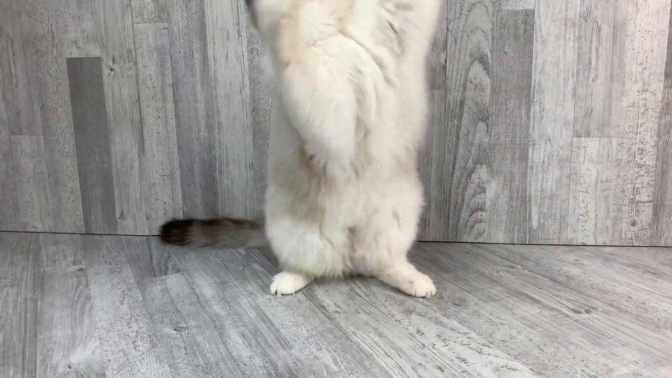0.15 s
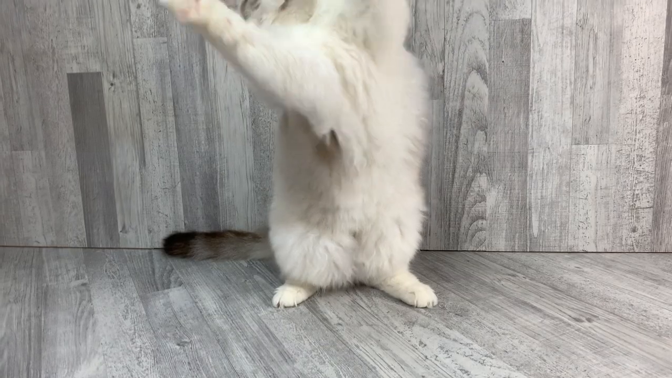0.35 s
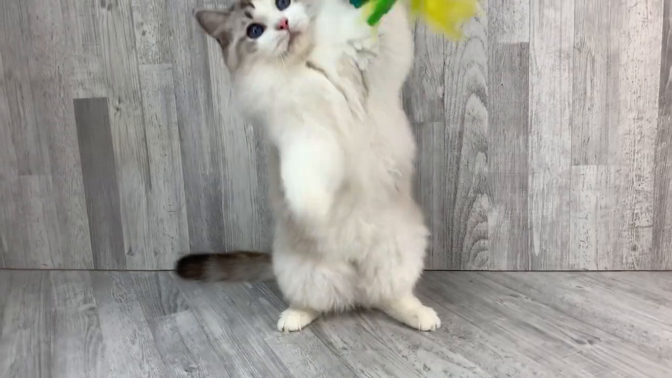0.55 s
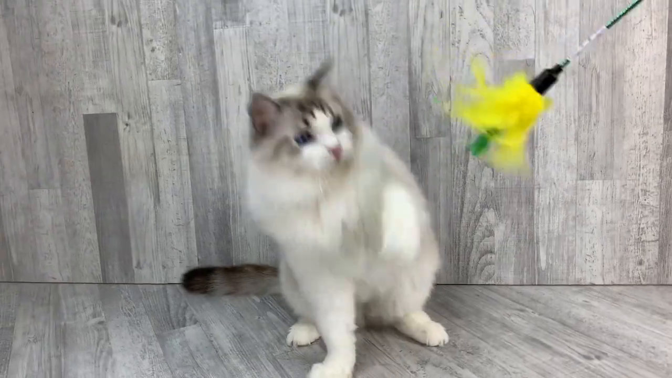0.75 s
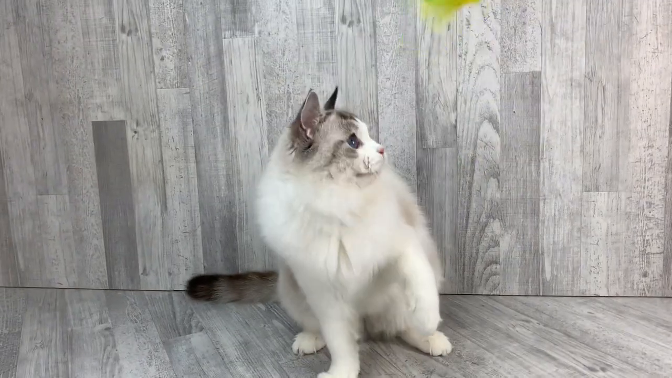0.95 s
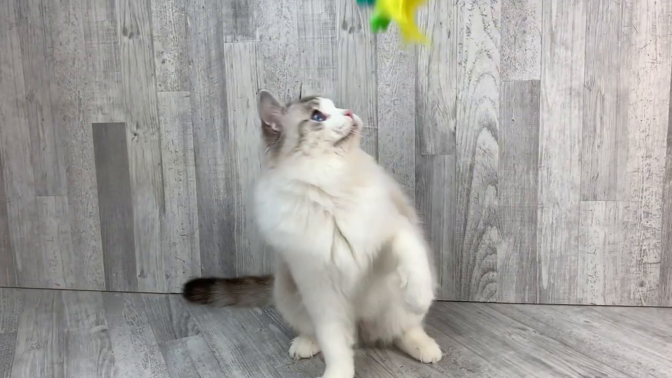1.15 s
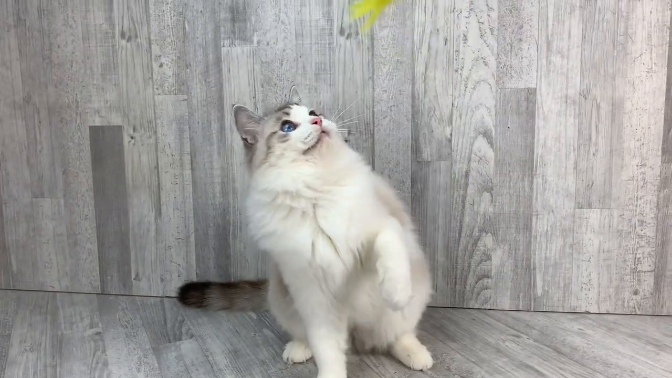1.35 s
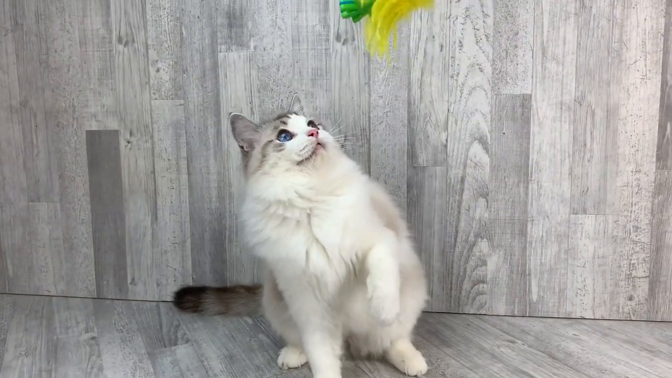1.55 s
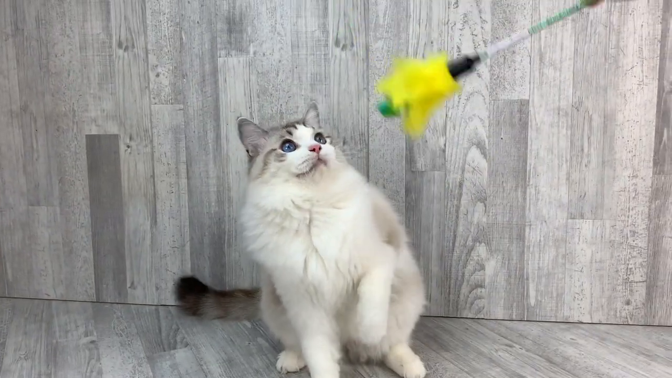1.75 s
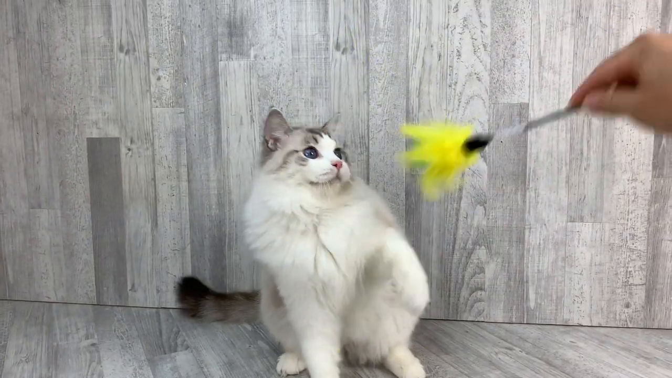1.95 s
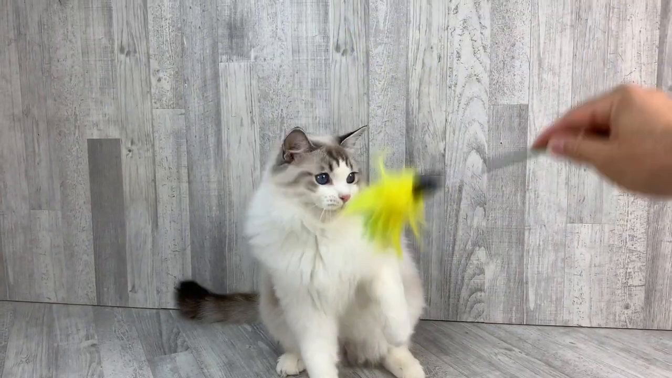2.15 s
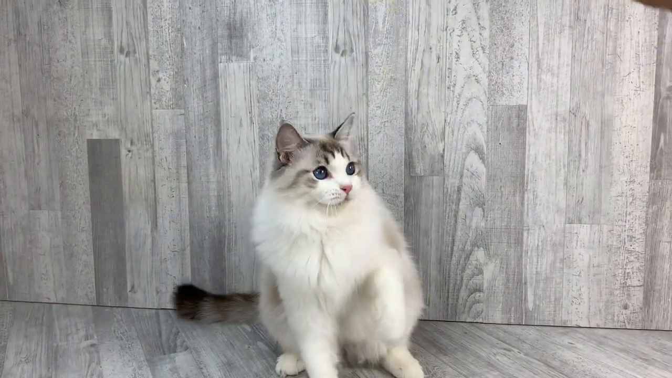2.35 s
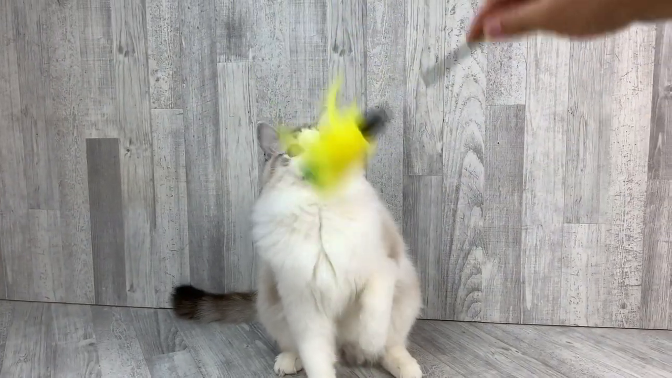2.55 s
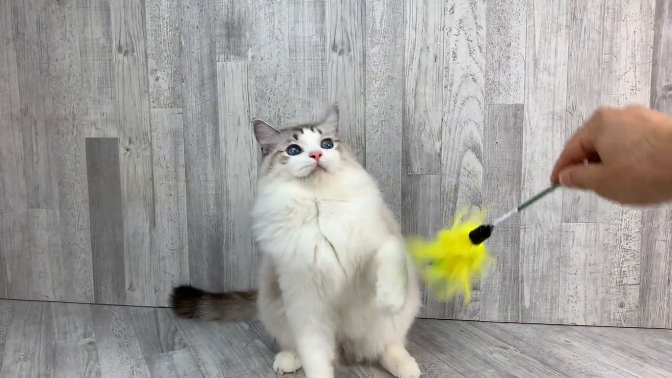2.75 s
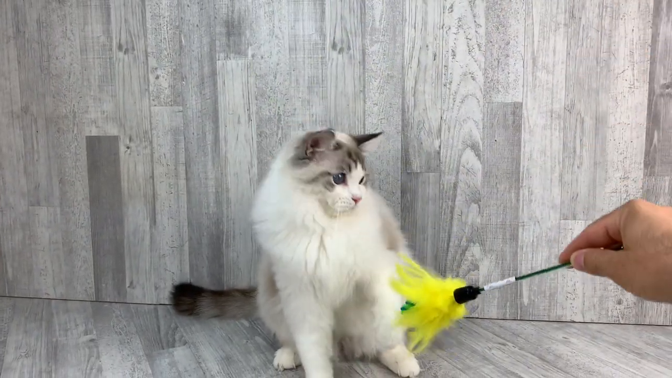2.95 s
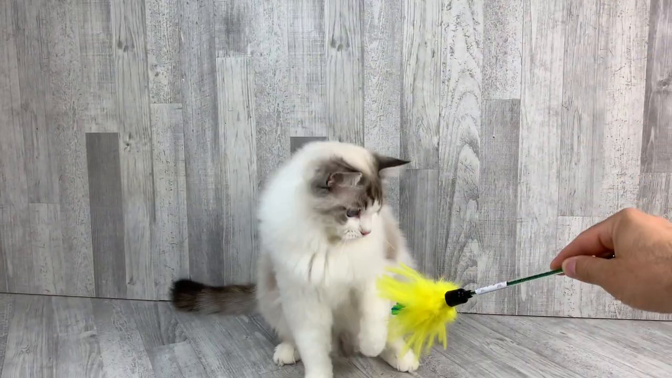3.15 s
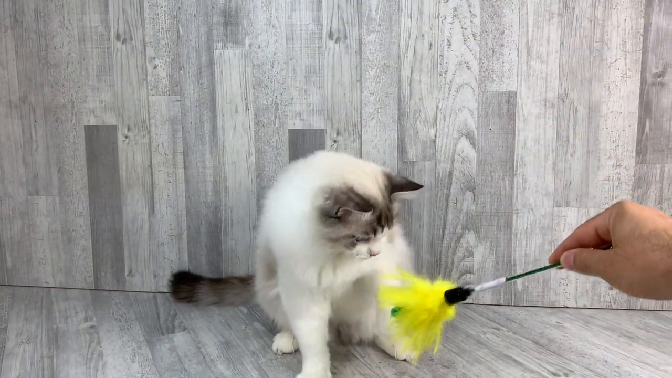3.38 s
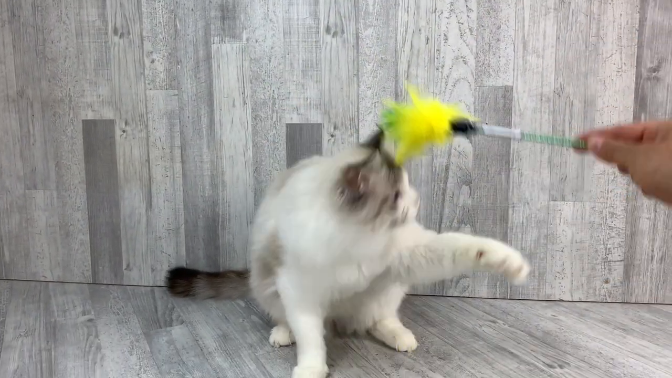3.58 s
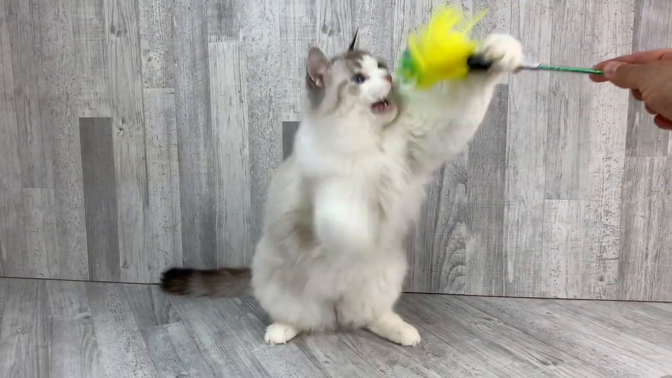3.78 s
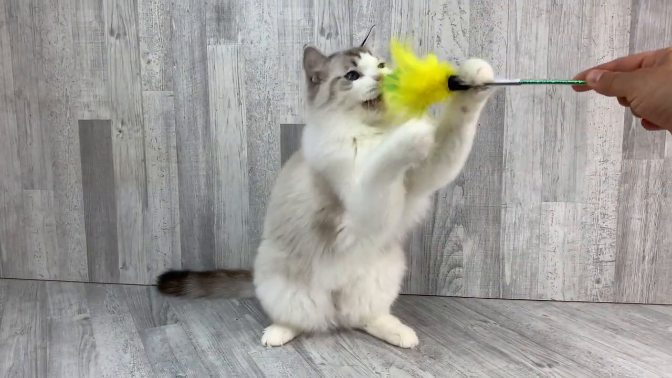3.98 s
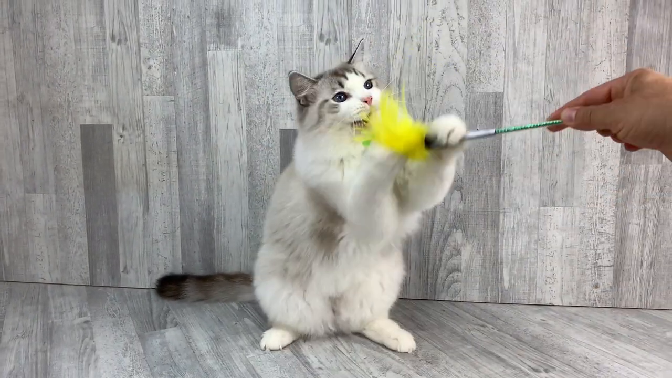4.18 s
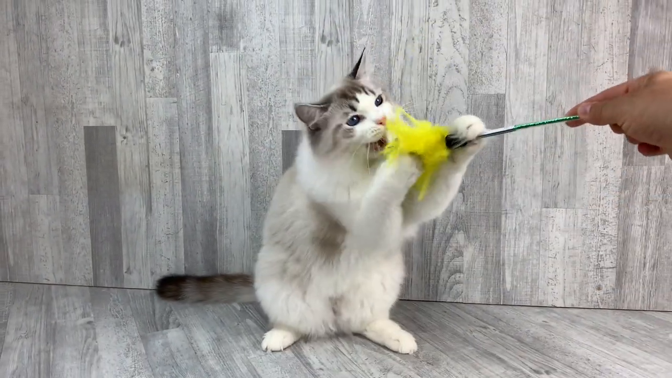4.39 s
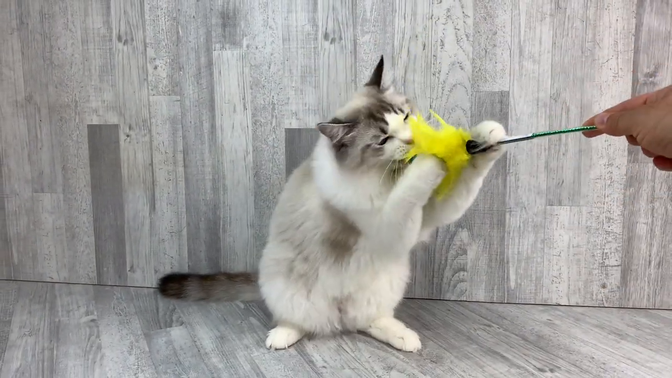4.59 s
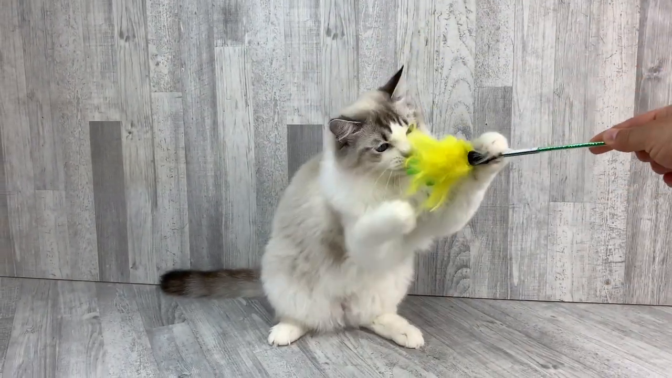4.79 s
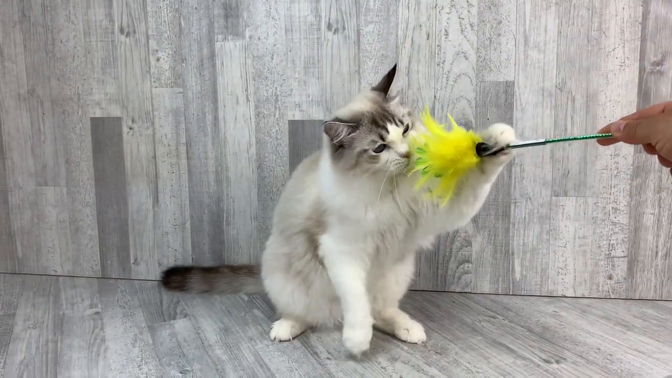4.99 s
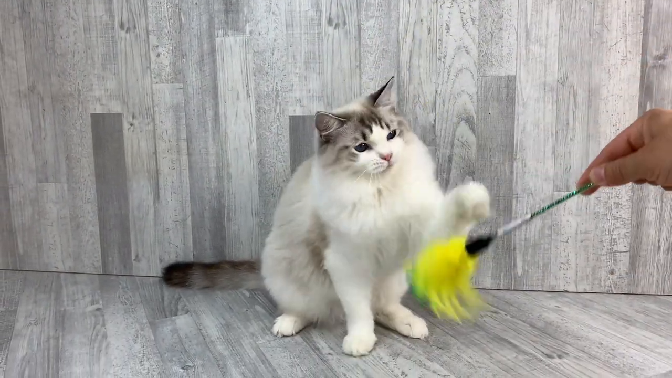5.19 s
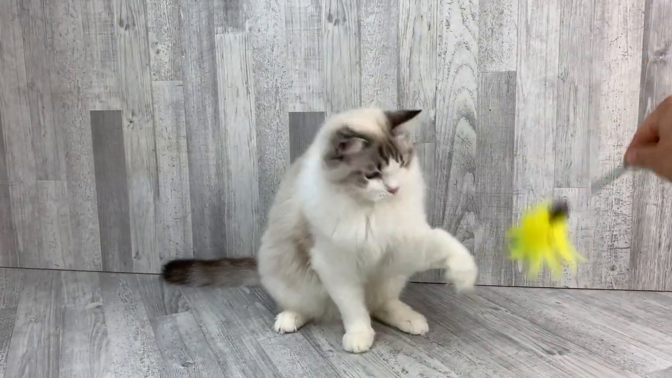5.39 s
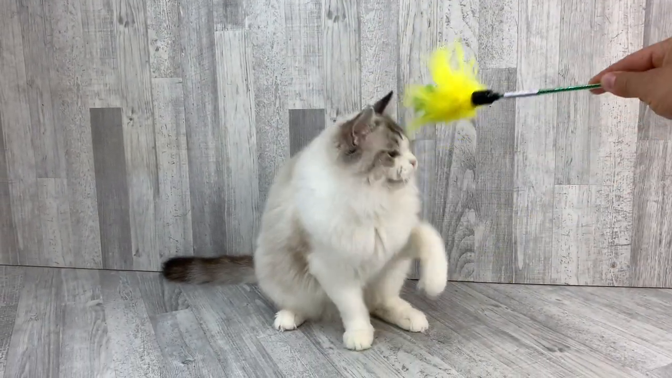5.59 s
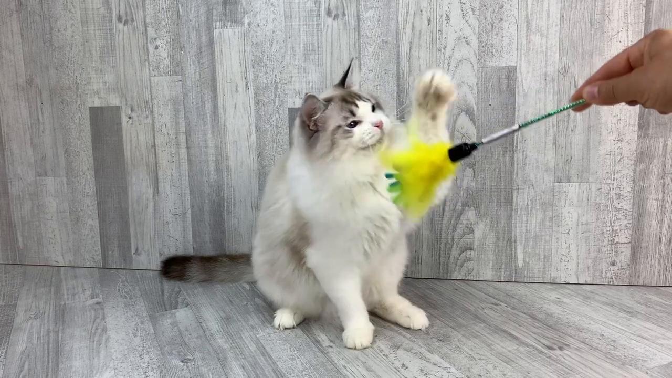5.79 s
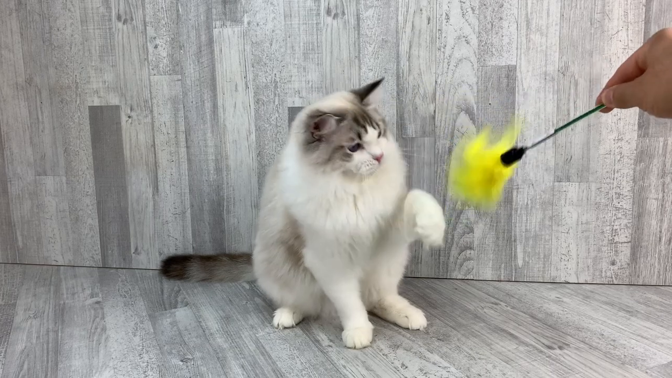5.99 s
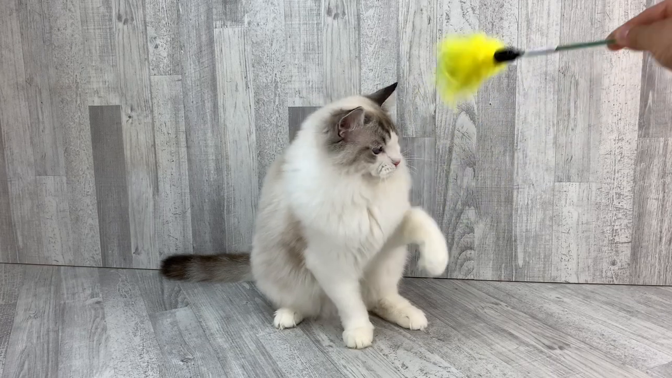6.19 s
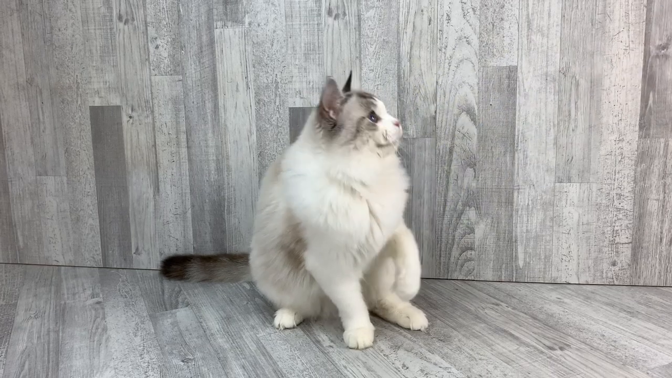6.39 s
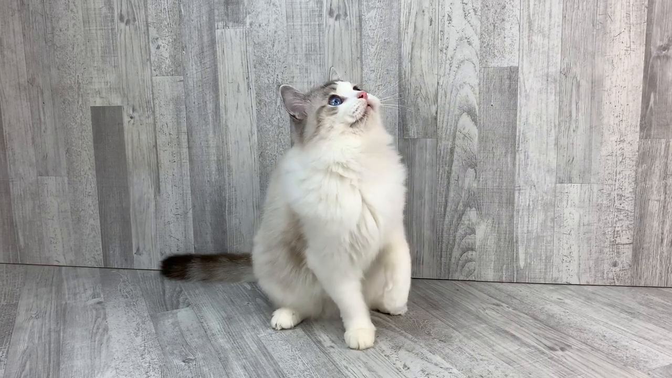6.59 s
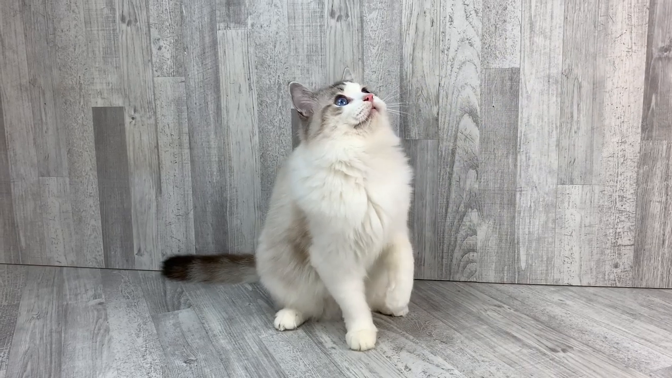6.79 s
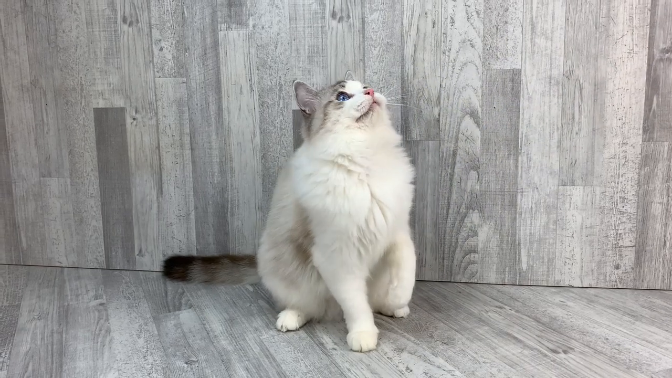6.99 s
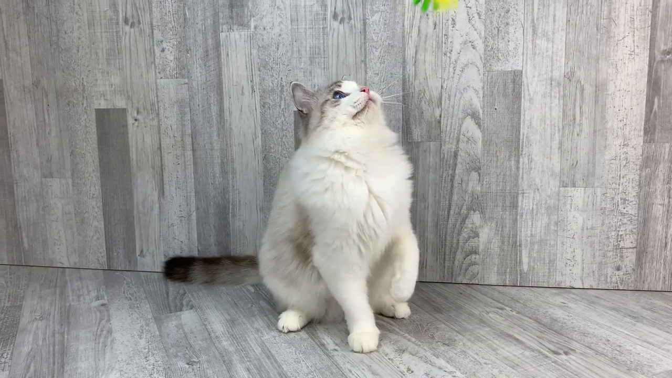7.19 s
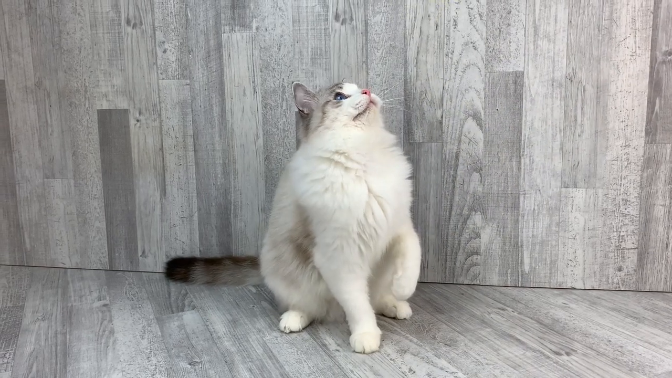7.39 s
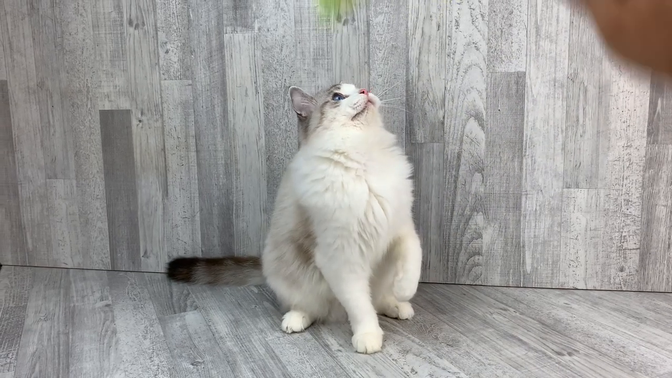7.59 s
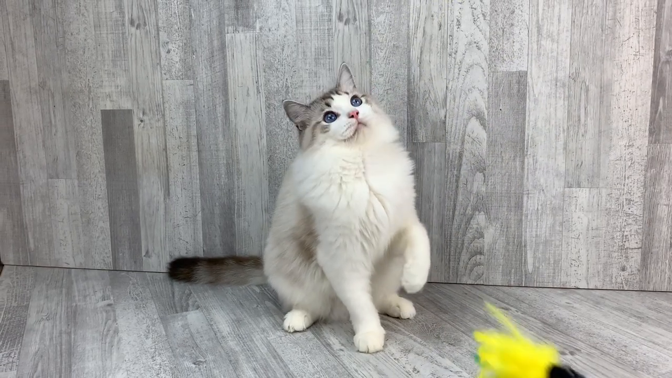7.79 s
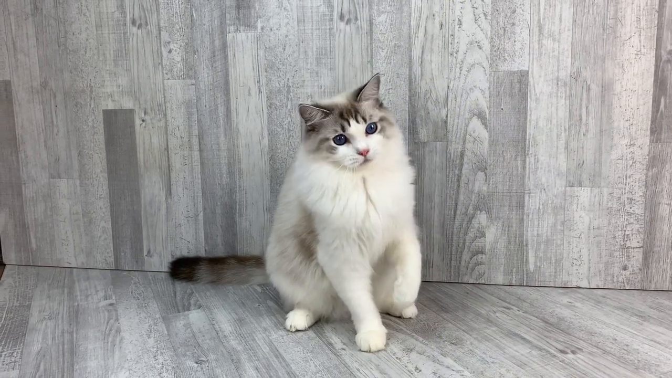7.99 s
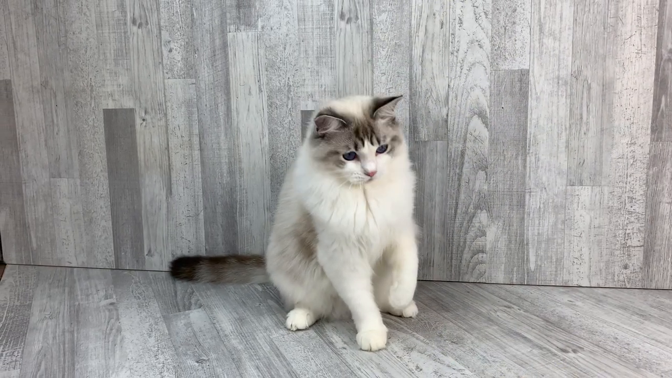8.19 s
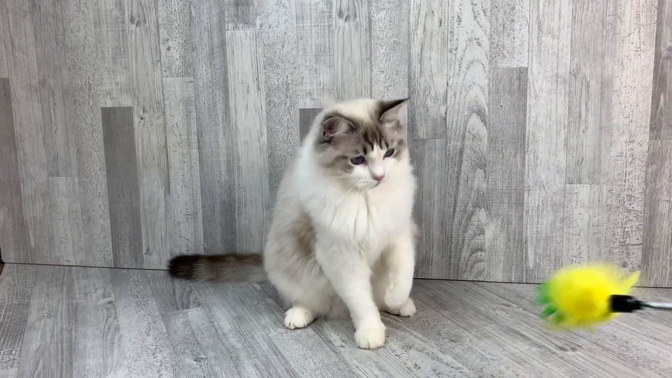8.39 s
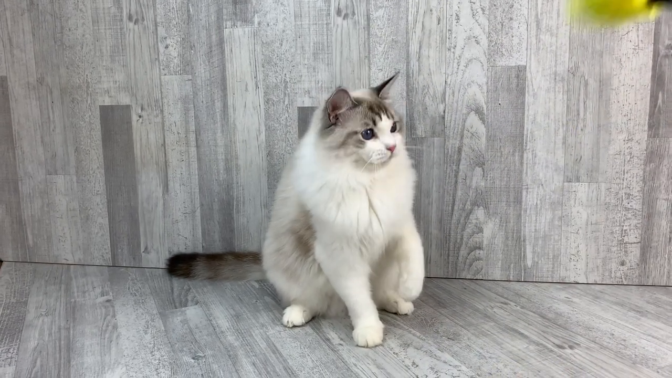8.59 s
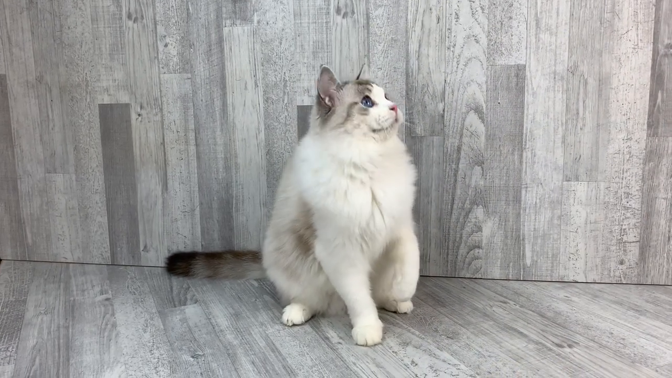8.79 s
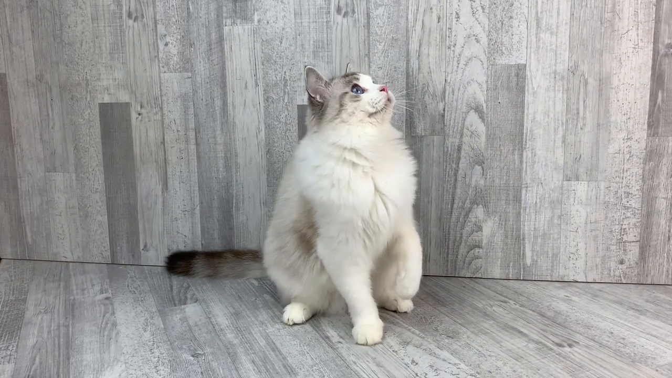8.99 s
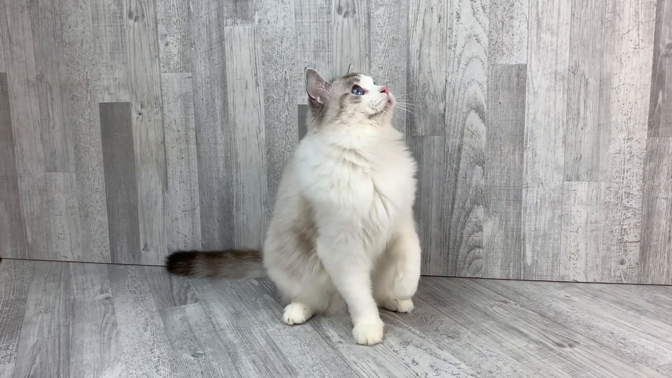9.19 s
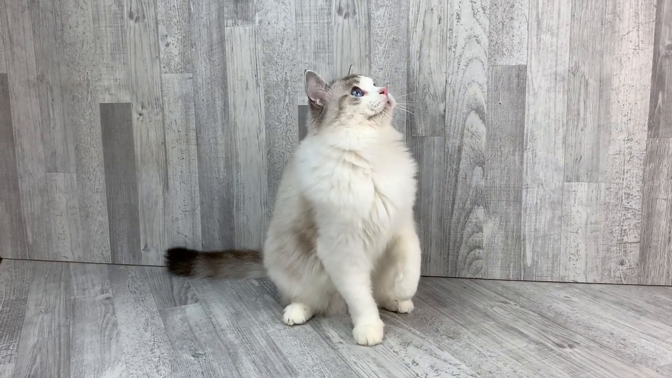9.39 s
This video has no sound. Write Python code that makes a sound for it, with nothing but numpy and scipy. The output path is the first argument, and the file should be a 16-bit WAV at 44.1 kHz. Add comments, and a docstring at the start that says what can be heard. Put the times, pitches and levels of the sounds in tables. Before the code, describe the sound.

A feather wand toy is shaken in quick bright clicking bursts, broken by near-silent gaps, with faint paw landings and a short bright echo.

```python
"""A bare room: a wand toy is shaken for a cat; its hard plastic parts clack, bounce and rattle as damped modes.
The walls answer with a short bright tail made of random echoes that die band by band.
Noise bands give room air, low rumble, wavering hums, rustle and scuffs; sines give a far motor and a faint tone.
Feathers puff as shaped hiss, and paws land as sagging low notes.
Two microphone ports hear it unlike in the middle band, and as one delayed signal in the treble."""
import sys
import numpy as np
from scipy import signal
from scipy.fft import rfft, irfft, next_fast_len
from scipy.io import wavfile
from scipy.ndimage import uniform_filter1d, minimum_filter1d

SR = 44100
rng = np.random.default_rng(int(sys.argv[2]) if len(sys.argv) > 2 else 0)


def elevation(decibels):
    """Turn decibel levels (scalar or array-like) into linear amplitude ratios."""
    levels = np.asarray(decibels, float)
    return 10 ** (levels / 20)


def master_out(mix):
    """Clip the mix to full scale and print it as 16-bit PCM to the path in sys.argv[1]."""
    frames = np.transpose(np.atleast_2d(mix))
    ceiling = np.clip(frames, -1, 1)
    pcm = np.round(ceiling * 32767).astype(np.int16)
    wavfile.write(sys.argv[1], SR, pcm)


N = 416744
LEAD_SAMPLES = 2048  # room for shaking before the start

# Room air spectrum. Each row: frequency in Hz, relative density in dB.
AIR_SPECTRUM = [(15, -45), (40, -14), (170, -3), (242, -10), (560, -19), (1300, -23), (4600, -31),
                (8600, -35), (13000, -35), (16000, -46)]
AIR_DB = -74.5
# Noise bands of rumble, low hum, high hum, rustle. Each row: centre in Hz, width in Hz.
LOW_BANDS = [(70, 50), (107, 7.7), (170, 35), (340, 460)]
# Random drift of these four bands. Each value: rms drift in dB.
DRIFT_DB = [3.5, 1.2, 2.8, 0.81]
DRIFT_S = 0.03  # pace of the drift
# Rumble under 95 Hz. Each row: time in seconds, level in dB before drift.
RUMBLE = [(0.0, -66), (0.5, -79.5), (0.55, -59.5), (0.73, -78.5), (0.84, -44), (1.42, -85), (3.45, -73),
          (3.79, -59), (5.0, -83.5), (5.16, -66.5), (5.53, -91), (5.69, -63.5), (6.42, -80), (6.55, -65),
          (7.37, -93), (7.68, -70), (8.29, -81), (9.45, -89)]
# Hum near 107 Hz. Each row: time in seconds, level in dB before drift.
LOW_HUM = [(0, -78.5), (.75, -77.5), (.89, -59), (1.35, -88.5), (2.501, -81.5), (3.6, -88.5), (4.4, -79.5),
           (5.0, -97.5), (5.18, -74), (6.2, -88.5), (9.45, -88.5)]
# Hum near 170 Hz. Each row: time in seconds, level in dB before drift.
HIGH_HUM = [(0, -77.5), (.34, -85.5), (.9, -64), (1.2, -80), (1.6, -75.5), (1.8, -72.5), (2.1, -74),
            (2.45, -86), (3.5, -79), (4.2, -73.5), (4.97, -76), (5.18, -62.5), (5.42, -76), (5.97, -62.5),
            (6.1, -79), (7.761, -74.5), (7.98, -68), (8.16, -79), (9.45, -79.5)]
RUSTLE_DB, RUSTLE_S = -68, 0.12  # gain on the shaking, smoothing time
# Paws and fur on the floor. Each row: centre in seconds, half length in seconds, level in dB before drift.
SCUFFS = [(.8, .06, -65), (2.22, .05, -68.5), (3.78, .08, -67), (5.21, .05, -60), (6.05, .1, -62.5),
          (7.71, .04, -63.5), (7.98, .04, -57), (8.3, 0.057, -72.5)]
TONE_HZ = 316
# Brief faint hum. Each row: time in seconds, level in dB before drift.
TONE = [(4.62, -100), (4.72, -75), (4.95, -74), (5.02, -100)]
DRONE_HZ, DRONE_THIRD_DB, DRONE_WOBBLE = 53.4, -1, 0.01  # third re second harmonic, rms fraction of pitch
# Far motor. Each row: time in seconds, level of the second harmonic in dB.
DRONE = [(2.6, -102), (2.8, -79), (3.4, -71), (3.65, -58), (3.85, -66.5), (4.2, -75.5), (4.4, -97)]
# Feathers in the air. Each row: centre in seconds, half length in seconds, level in dB.
SWISHES = [(4.66, 0.08, -79), (4.82, 0.067, -81), (8.25, 0.016, -64), (8.305, 0.0266, -61),
           (9.32, .03, -88)]
# Feather hiss spectrum. Each row: frequency in Hz, relative level in dB.
SWISH_SPECTRUM = [(1500, -20), (2300, -1), (5000, 0), (7000, -6), (12000, -8), (16000, -14)]
# Paws landing. Each row: start in seconds, nominal level in dB, start pitch in Hz, end pitch in Hz,
# 60 dB decay in seconds.
THUMPS = [(0.776, -48.5, 259.3, 69.4, .35), (5.15, -66, 112, 76, 0.13), (5.2, -49, 513, 253, 0.07),
          (5.69, -52, 88, 54, 0.15), (6.66, -54.5, 99.7, 54.6, 0.23), (7.972, -64, 487, 251, 0.065)]

# Clacks. Each row: start in seconds, nominal level of the bright band in dB, middle band and low band
# relative to it in dB (all before the band offsets), pitch that stands out in Hz.
CLACKS = [(-.008, -11.5, -20, -25.5, 4000), (0.0717, -18, -21.5, -32, 5660),
          (0.1421, -3.5, -12, -35.5, 4000), (0.2114, -8.5, -17, -24, 4900), (0.2912, -18, -29.5, -45, 6290),
          (0.3611, -11.5, -21, -26, 6000), (0.4354, -12, -16.5, -26.5, 5900),
          (0.5132, -15, -16.5, -33.5, 6900), (0.5701, -20, -23.5, -32.5, 6140),
          (0.6414, -13, -21.5, -29.5, 7200), (0.7038, -6, -16.5, -22.5, 5940),
          (0.7512, -18.5, -4.5, -20.5, 4300), (0.7687, -14, -18, -23, 5000), (0.7981, -23, -22, -23, 4910),
          (0.827, -12, -14.5, -23, 7440), (0.8914, -6.5, -14, -23, 4740),
          (0.9467, -4.5, -10.5, -21.5, 5970), (1.0086, -7, -12, -19, 7000), (1.072, -3.5, -16.5, -30, 4900),
          (1.1333, -6.5, -14.5, -26.5, 6860), (1.1932, -14, -10.5, -14.5, 6600),
          (1.258, -9.5, -22, -26, 4590), (1.3134, -20, -16.5, -41, 7200), (1.3862, -17.5, -19, -38, 7450),
          (1.4361, -19, -24.5, -28, 4680), (1.5234, -40, -26, -28, 5240), (1.8248, -36, -17.5, -39, 5530),
          (1.9026, -37, -34, -29, 7280), (2.0088, -22, -18.5, -23.5, 5130),
          (2.0812, -10.5, -10.5, -16.5, 4640), (2.151, -12, -17, -27, 6200), (2.2154, -7, -12, -44.5, 6100),
          (2.2767, -18.5, -20.5, -35, 6050), (2.3575, -7.5, -18, -26.5, 5400),
          (2.4134, -20, -15.5, -25, 6300), (2.4848, -7.5, -14.5, -31.5, 4820),
          (2.5546, -2.5, -20, -25.5, 4400), (2.6244, -10.5, -25.5, -23.5, 2640),
          (2.7003, -26, -22, -35.5, 5050), (2.811, -18, -14, -34, 6500), (2.8734, -10.5, -32.5, -37, 7800),
          (2.9158, -25.5, -25, -42, 5270), (2.9786, -31, -23.5, -20.5, 5990), (3.0051, -37, -25, -37, 5220),
          (3.5279, -30, -29.5, -36, 4810), (3.5862, -33, -18, -18.5, 6800),
          (3.6606, -6.5, -22, -33.5, 4200), (3.7314, -6.5, -16.5, -20, 4550), (3.7958, -15, -15, -27, 5000),
          (3.8182, -27.5, -15.5, -28, 5160), (3.8357, -6, -19.5, -33.5, 5270),
          (3.8806, -13, -11.5, -10.5, 3260), (3.9833, -28.5, -16, -20, 6700),
          (4.0791, -22, -14.5, -26.5, 5700), (4.1619, -29, -12.5, -22, 5460),
          (4.2148, -21.5, -21, -25.5, 5520), (4.2702, -22, -20.5, -18.5, 5710),
          (4.4014, -48.5, -18, -36, 6150), (4.6154, -51.5, -7.5, -9, 7220), (4.6947, -40.5, -17, -22, 6000),
          (4.8005, -37, -22, -19, 7070), (4.8524, -47.5, -12.5, -20, 6470),
          (5.1617, -14.5, -14.5, -30, 3820), (5.2056, -13.5, -6.5, -36, 6400),
          (5.2764, -13, -15, -23, 6750), (5.3408, -6.5, -12.5, -32, 5440), (5.4036, -8.5, -12, -22.5, 3400),
          (5.5049, -7, -19.5, -26.5, 7960), (5.5722, -7.5, -14, -30, 6660), (5.7024, -22, -33, -31, 6400),
          (5.7708, -17.5, -16.5, -26, 6050), (5.8361, -18, -28.5, -30, 4950),
          (5.9065, -21, -16.5, -19, 6000), (5.9309, -38, -10.5, -15, 7170), (5.9504, -17, -13, -20, 6900),
          (6.0122, -9.5, -31.5, -57, 7100), (6.0766, -8, -11, -41, 6170), (6.1414, -6, -16.5, -21.5, 4080),
          (6.2073, -5, -12, -29.5, 2940), (6.2701, -8, -17.5, -26.5, 3300), (6.335, -28, -12.5, -27, 7500),
          (6.4118, -13, -29, -30, 6900), (6.4717, -17.5, -22, -38, 7500), (6.5306, -31.5, -16.5, -25, 4930),
          (6.5979, -32, -15, -34, 5700), (6.6538, -39, -25, -26, 5500), (6.8159, -33.5, -37, -47, 5850),
          (6.8848, -8, -31, -27.5, 7900), (6.9441, -8, -10, -20, 7400), (6.993, -7.5, -15.5, -36, 5500),
          (7.0529, -3.5, -17.5, -22.5, 7600), (7.1147, -6.5, -23.5, -21.5, 4500),
          (7.1781, -15.5, -13.5, -24, 4740), (7.228, -18, -19, -40.5, 6700),
          (7.2933, -15, -16, -24.5, 5140), (7.3362, -15, -25.5, -26.5, 4600),
          (7.3976, -16, -16.5, -22, 5800), (7.5268, -16, -25.5, -22.5, 4500),
          (7.6425, -10.5, -15.5, -29.5, 3920), (7.7154, -15.5, -38, -26, 7200),
          (7.7857, -19.5, -18, -22, 5640), (7.863, -16.5, -18, -28, 6760), (7.9084, -23, -41, -31, 6150),
          (7.9613, -30.5, -3.5, -18, 7230), (8.4168, -24, -16, -27.5, 6060), (8.4941, -7, -19, -31, 6800),
          (8.553, -7, -11, -38, 5400), (8.6098, -16.5, -14.5, -26.5, 7100), (8.6328, -38, -9.5, -39, 6170),
          (8.6652, -17, -15, -31, 6700), (8.6852, -22, -16.5, -29, 7000), (8.7261, -7.5, -17, -31, 5800),
          (8.7789, -7, -11.5, -18, 4600), (8.8368, -5, -9.5, -20.5, 3130),
          (8.8967, -15.5, -13.5, -25, 4700), (8.9426, -11, -15, -23.5, 5170),
          (9.3102, -46.5, -19, -41, 5930), (9.4025, -21, -27, -30, 6800), (1.2124, -22, -7, -22, 4790),
          (1.9225, -44.5, -14, -38, 7360), (3.5544, -35, -21, -18, 6280), (4.8678, -52.5, 1, -4, 6860),
          (5.225, -20, -12, -21.5, 4890), (5.3614, -28, -8, -35, 5030), (5.447, -27, -13, -29, 5160),
          (5.6231, -32, -14.5, -32, 6260), (5.7912, -22.5, -17, -35, 5770),
          (6.2254, -21.5, -13.5, -18, 2510), (7.1364, -17.5, -16, -18.5, 7230),
          (7.4374, -30, -13, -28, 5460), (7.9698, -38, 3, -19.5, 2590), (8.5144, -24.5, -2, -29, 7290),
          (9.4274, -29, -12.5, -29, 5440)]
# Modes of the plastic parts, one list a band: bright, low, middle, top, upper middle.
# Each row: frequency in Hz, relative level within the band in dB.
PARTS = [
    [(10000, -2.5), (10700, -5.5), (11400, -3), (12100, -11.5), (12700, -1)],
    [(700, -14), (950, 14.5), (1200, 1), (1550, -15.5), (1900, -14.5), (2300, 20)],
    [(2800, -0.5), (3400, -2.5), (4100, 0.5), (4800, -1), (5500, -1), (6300, -0.5)],
    [(13500, -22.5), (14200, -7), (14900, -5), (15500, 7)],
    [(7200, -3), (7900, -10.5), (8600, 6), (9300, -9)],
]
# Radiation of the five bands. Each value: offset in dB.
BAND_DB = [1.2, 1.7, 1.68, 4.8, 11.93]
# Damping of the five bands. Each value: 60 dB decay in seconds.
RING_T60_S = [0.0029, 0.0041, 0.0033, .003, 0.0025]
# Top and upper middle band. Each value: mean level relative to the bright band in dB, before the offsets.
USUAL_DB = [-11.5, -18]
# The same two bands. Each value: random spread from clack to clack in dB.
SCATTER_DB = [2.5, 2.5]
# Contacts after the first. Each row: median delay in seconds, level relative to the clack in dB before scatter.
BOUNCES = [(.0016, 1.5), (.0035, -3.5), (.007, -10.5), (.012, -16), (.021, -14)]
BOUNCE_SCATTER = 0.4  # spread of the log of each delay
FAVOUR_DB, FAVOUR_OCTAVES = 8.5, 0.3  # boost of modes near the struck part's pitch
TOUCH_S = 0.0004  # rise of a contact
RATTLE_PER_S, RATTLE_DB = 400, -19.5
RATTLE_MIDDLE_DB, RATTLE_LOW_DB = -10, -20  # re the bright band, before the offsets
THIN_HZ = 620  # small parts radiate little below this

# Tail decay. Each row: frequency in Hz, 60 dB decay in seconds.
ROOM_T60 = [(300, .28), (800, .26), (2000, .28), (5500, .25), (10000, .2), (15000, .16)]
# Tail colour. Each row: frequency in Hz, relative level in dB.
TAIL_COLOUR = [(500, 0), (3000, 1.5), (6000, 4), (10000, 0.6), (16000, 0.5)]
TAIL_DB, EARLY_DB, EARLY_T60_S = -4, -10, 0.022  # levels re the direct path

# Likeness of the two ports. Each row: frequency in Hz, share of the left signal in the right, 0 to 1.
LIKENESS = [(60, .94), (150, .92), (300, .78), (600, .7), (1200, .15), (6000, .1), (7000, .7), (8300, .99),
            (16000, .98)]
# Colour of the right port. Each row: frequency in Hz, gain in dB.
RIGHT_COLOUR = [(300, 0), (1000, -1.5), (2200, 0), (4000, 1.5), (5400, 6.5), (6700, .3), (16000, 0)]
LAG_S, IN_STEP_HZ = 2.06e-4, 10950  # left lags in the treble; shared part is in step at this pitch
# Upper band edge. Each row: frequency in Hz, gain in dB.
EDGE = [(15700, 0), (15950, -17), (16500, -22), (16900, -45), (17300, -90)]
CEILING, LIMIT_S = 0.93, 0.002  # limiter peak, hold and smoothing time


def evened(x):
    """Scales to rms 1."""
    return x / np.sqrt(np.mean(x ** 2) + 1e-20)


def read(points, hz):
    """Reads a table along log frequency."""
    f, value = np.transpose(points)
    return np.interp(np.log(hz + 1), np.log(f + 1), value)


def filtered(x, gain):
    """Applies a gain given as a function of frequency."""
    size = next_fast_len(N + 4096)
    return irfft(rfft(x, size) * gain(np.fft.rfftfreq(size, 1 / SR)), size)[..., :N]


def curve(rows):
    """Level curve, straight in dB between rows of time and level."""
    return elevation(np.interp(np.arange(N) / SR, *np.transpose(rows)))


def swells(rows):
    """Bell-shaped swells of level."""
    t = np.arange(N) / SR
    return sum(elevation(db) * np.exp(-((t - s) / half_s) ** 2) for s, half_s, db in rows)


def drift():
    """Slow random wander of rms 1: low-passed noise."""
    return evened(filtered(rng.standard_normal(N), lambda hz: np.exp(-(hz * DRIFT_S) ** 2)))


def room_air():
    """Steady noise, independent at each port, shaped by a spectrum."""
    noise = rng.standard_normal((2, N))
    return elevation(AIR_DB) * evened(filtered(noise, lambda hz: elevation(read(AIR_SPECTRUM, hz))))


def rustle_level(shake):
    """Low rustle of feathers and sleeve follows the smoothed shaking; scuffs are added as swells."""
    span = round(RUSTLE_S * SR)
    smooth = uniform_filter1d(uniform_filter1d(shake[LEAD_SAMPLES:], span), span)
    return elevation(RUSTLE_DB) * smooth * span + swells(SCUFFS)


def low_noises(shake):
    """Rumble, two fuzzy hums and rustle: narrow noise bands, each drifting in level."""
    out = np.zeros((2, N))
    levels = [curve(RUMBLE), curve(LOW_HUM), curve(HIGH_HUM), rustle_level(shake)]
    for (mid_hz, width_hz), level, drift_db in zip(LOW_BANDS, levels, DRIFT_DB):
        noise = rng.standard_normal((2, N))
        band = filtered(noise, lambda hz: 1 / (1 + (2 * (hz - mid_hz) / width_hz) ** 4))
        out += evened(band) * level * elevation(drift_db * drift())
    return out


def faint_tone():
    """One sine that swells briefly, its level wavering."""
    t = np.arange(N) / SR
    return curve(TONE) * np.sin(2 * np.pi * TONE_HZ * t) * elevation(3.7 * drift())


def drone():
    """A far motor: second and third harmonic swell and fade, the pitch wandering a little."""
    t = np.arange(N) / SR
    wander = evened(filtered(rng.standard_normal(N), lambda hz: np.exp(-(hz / 2.0) ** 2)))
    turn = 2 * np.pi * np.cumsum(DRONE_HZ * (1 + DRONE_WOBBLE * wander)) / SR
    level = elevation(np.interp(t, *np.transpose(DRONE), -140, -140))
    return level * (np.sin(2 * turn) + elevation(DRONE_THIRD_DB) * np.sin(3 * turn))


def swishes():
    """Soft puffs of hiss as the feathers sweep the air."""
    noise = rng.standard_normal((2, N))
    return swells(SWISHES) * evened(filtered(noise, lambda hz: elevation(read(SWISH_SPECTRUM, hz))))


def thumps():
    """Each soft landing pushes the floor, whose note sags as the paw settles."""
    out, t = np.zeros(N + SR), np.arange(SR // 2) / SR
    for s, db, from_hz, to_hz, t60_s in THUMPS:
        hz = to_hz + (from_hz - to_hz) * np.exp(-t / 0.035)
        push = elevation(db - 60 * t / t60_s) * (1 - np.exp(-t / 0.0032))
        out[round(s * SR):][:len(t)] += push * np.sin(2 * np.pi * np.cumsum(hz) / SR)
    return out[:N]


def band_levels(middle_db, low_db, chance):
    """Band levels of a contact relative to its nominal level, in the order of PARTS."""
    top_db, upper_db = np.add(USUAL_DB, np.multiply(SCATTER_DB, chance))
    return np.add([0, low_db, middle_db, top_db, upper_db], BAND_DB)


def contact(levels_db, pitch_hz, chance):
    """One contact rings every mode, each a little off pitch and with its own share of the band."""
    t = np.arange(500) / SR
    hz, mode_db = np.concatenate(PARTS).T[:, :, None]
    band = np.repeat(np.arange(len(PARTS)), list(map(len, PARTS)))
    detune, spread = chance[:len(band)].T[:, :, None]
    share = elevation(mode_db + 3 * spread)
    share = share / np.sqrt(np.bincount(band, share[:, 0] ** 2))[band, None]
    favour_db = FAVOUR_DB * np.exp(-(np.log2(hz / pitch_hz) / FAVOUR_OCTAVES) ** 2)
    fade = elevation(levels_db[:, None] - 60 * t / np.array(RING_T60_S)[:, None])[band]
    rings = share * elevation(favour_db) * fade * np.sin(2 * np.pi * hz * (1 + 0.044 * detune) * t)
    # 4 makes up for about what the slow rise costs the peak
    return 4 * rings.sum(0) * (1 - np.exp(-(t / TOUCH_S) ** 2))


def rattle(shake, count=12):
    """Loose bits tick on at random, their size following the dying motion after each clack."""
    n = len(shake)
    motion = signal.lfilter([1], [1, -elevation(-60 / (0.22 * SR))], shake)  # 60 dB in 0.22 s
    scatter = elevation(3.91 * np.minimum(rng.exponential(1, n), 2))
    size = motion * scatter * (rng.random(n) < RATTLE_PER_S / SR)
    kind = rng.integers(0, count, n)
    levels_db = band_levels(RATTLE_MIDDLE_DB, RATTLE_LOW_DB, 0)
    out = np.zeros(n)
    for k, chance in enumerate(rng.standard_normal((count, sum(map(len, PARTS)), 2))):
        tick = contact(levels_db, 3500 * 2 ** (chance[0, 0] / 2), chance)
        out += signal.oaconvolve(size * (kind == k), tick)[:n]
    return elevation(RATTLE_DB) * out


def clacks(count=8):
    """Each clack is a first contact and a few bounces; the toy moves, so clacks come from several spots."""
    out, shake = np.zeros((count, N + SR)), np.zeros(N + LEAD_SAMPLES)
    after_s, bounce_db = np.transpose([(0.00047, 0.013)] + BOUNCES)  # first contact leads
    chance = rng.standard_normal((len(CLACKS), len(after_s) + 1, sum(map(len, PARTS)) + 1, 2))
    for k, (s, db, middle_db, low_db, pitch_hz) in enumerate(CLACKS):
        shake[LEAD_SAMPLES + round(s * SR)] = elevation(db)
        bands_db = band_levels(middle_db, low_db, chance[k, -1, 0])
        for j, c in enumerate(chance[k, :-1]):
            delay_s = after_s[j] * np.exp(BOUNCE_SCATTER * c[-1, 0])
            at = LEAD_SAMPLES + round((s + delay_s) * SR)
            size_db = db + bounce_db[j] + 3 * np.clip(c[-1, 1], -2, 0.6) * (j > 0)
            out[k % count, at:at + 500] += contact(size_db + bands_db, pitch_hz, c)
    return out[:, :N + LEAD_SAMPLES], shake


def room(spots):
    """For each spot and port: the direct path, dense near echoes, then a tail that dies by band."""
    shape = (len(spots), 2, SR // 2)
    taps = rng.choice([-1., 1.], shape) * (rng.random(shape) < 3000 / SR)  # 3000 echoes a second
    taps[..., :90] = 0
    early = taps * elevation(-60 * np.arange(shape[2]) / SR / EARLY_T60_S)
    hz, frame_s, z = signal.stft(taps, SR, nperseg=128)
    decay = elevation(read(TAIL_COLOUR, hz)[:, None] - 60 * frame_s / read(ROOM_T60, hz)[:, None])
    tail = signal.istft(z * decay, SR, nperseg=128)[1][..., :shape[2]]
    paths = elevation(TAIL_DB) * tail / np.linalg.norm(tail, axis=2, keepdims=True)
    paths = paths + elevation(EARLY_DB) * early / np.linalg.norm(early, axis=2, keepdims=True)
    paths[:, 0, 0] += 1
    # a part's two faces push in opposite sense
    sense = (-1) ** np.arange(len(spots))
    paths[np.arange(len(spots)), 1, rng.integers(0, 30, len(spots))] += sense
    heard = slice(LEAD_SAMPLES, LEAD_SAMPLES + N)
    return sum(signal.oaconvolve(x[None], p, axes=1)[:, heard] for x, p in zip(spots, paths))


def scene():
    """The toy in the room over the background."""
    spots, shake = clacks()
    spots[0] += rattle(shake)
    toy = filtered(room(spots), lambda hz: 1 / np.sqrt(1 + (THIN_HZ / (hz + 1)) ** 8))
    background = room_air() + low_noises(shake) + faint_tone() + drone()
    return background + swishes() + thumps() + toy


def roll_off(x):
    """The treble ends steeply here."""
    return signal.sosfilt(signal.butter(12, 16980, fs=SR, output="sos"), x)


def record(dry):
    """The right port shares part of the left, ahead in the treble; then its colour, a limiter, the band edge."""
    same = lambda hz: np.clip(read(LIKENESS, hz), 0, 1)
    ahead = lambda hz: np.exp(2j * np.pi * LAG_S * (hz - IN_STEP_HZ) * (hz > 6000))
    shared = filtered(dry[0], lambda hz: same(hz) * ahead(hz))
    own = filtered(dry[1], lambda hz: np.sqrt(1 - same(hz) ** 2))
    right = filtered(shared + own, lambda hz: elevation(read(RIGHT_COLOUR, hz)))
    both = np.array([dry[0], right])
    span = round(LIMIT_S * SR)
    limit = np.minimum(1, CEILING / (abs(both).max(0) + 1e-9))
    both = both * uniform_filter1d(minimum_filter1d(limit, 2 * span + 1), span)
    mix = filtered(both, lambda hz: elevation(read(EDGE, hz)))
    return roll_off(mix)


dry = scene()
out = record(dry)
master_out(out)
```